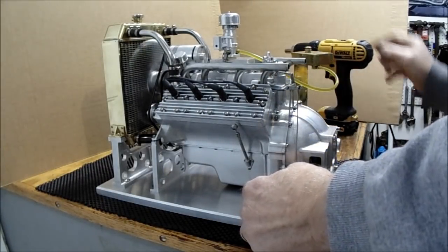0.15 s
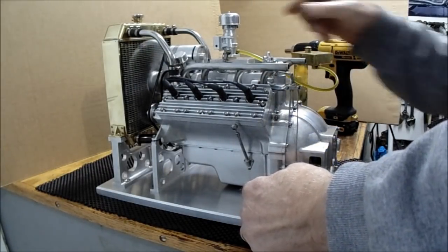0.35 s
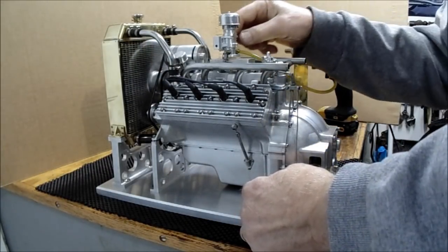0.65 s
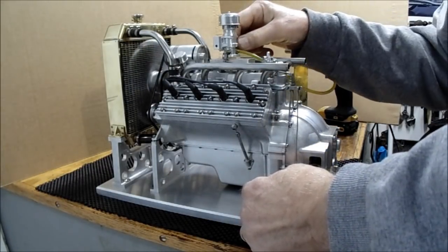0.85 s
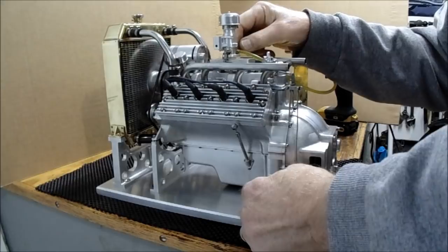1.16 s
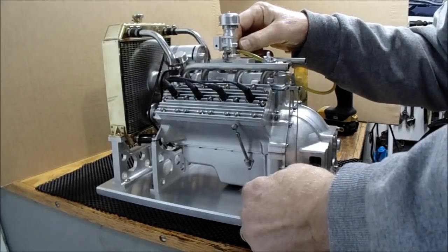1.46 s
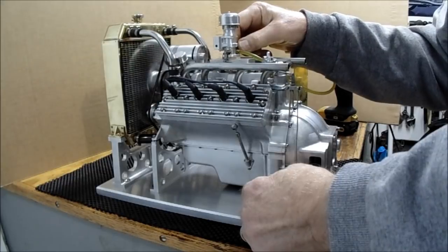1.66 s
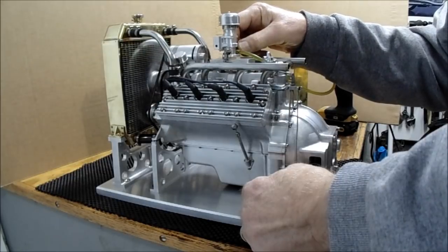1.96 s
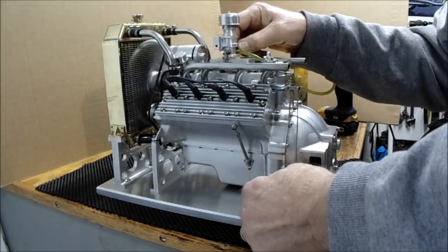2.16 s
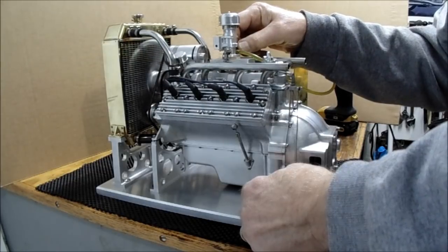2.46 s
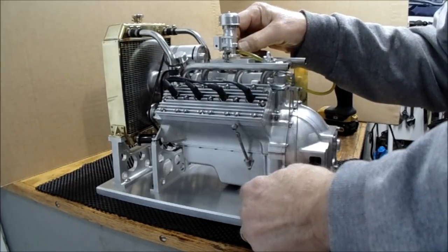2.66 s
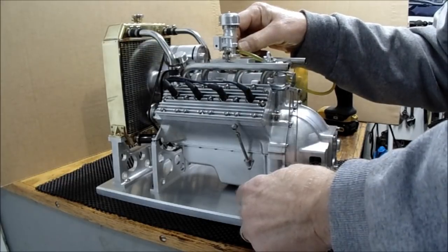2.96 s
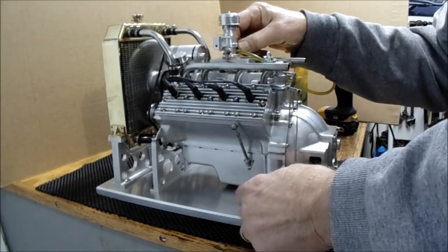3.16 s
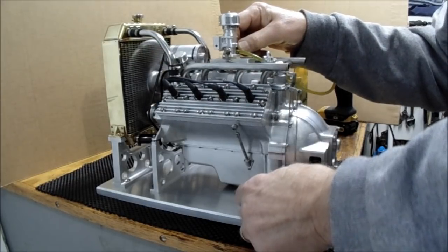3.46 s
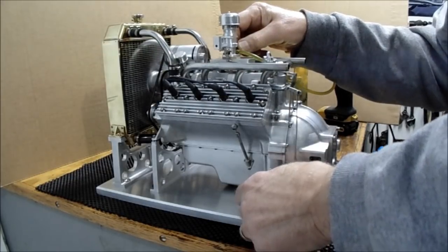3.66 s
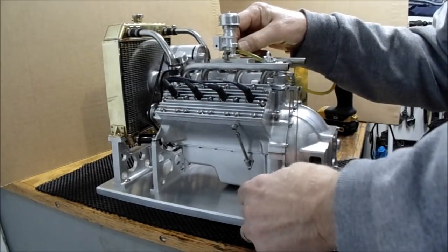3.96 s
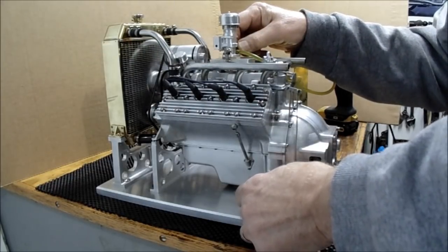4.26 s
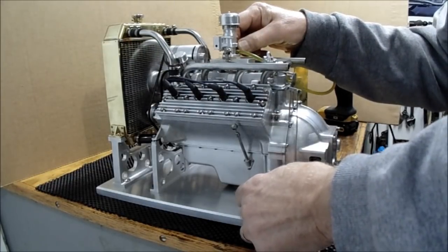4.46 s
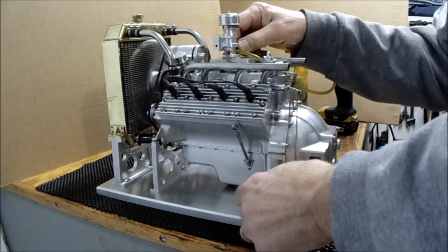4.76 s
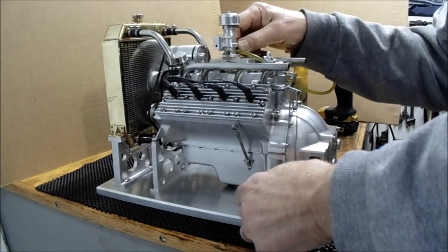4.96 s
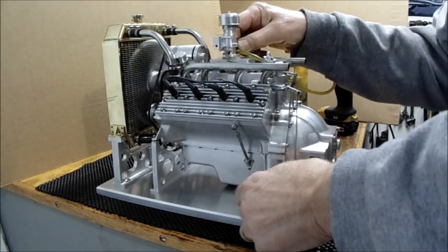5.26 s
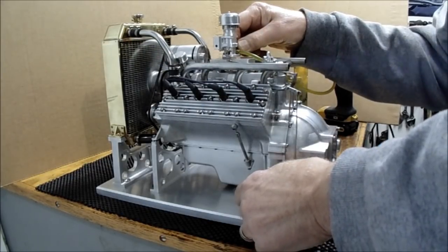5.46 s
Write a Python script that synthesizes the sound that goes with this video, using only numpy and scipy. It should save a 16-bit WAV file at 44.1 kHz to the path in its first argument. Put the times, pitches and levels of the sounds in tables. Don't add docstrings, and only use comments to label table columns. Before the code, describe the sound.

A small eight-cylinder engine idles lumpily on a bench, then revs up, dips briefly, and climbs to a tight, hissing, ticking snarl.

```python
import sys
import numpy as np
from scipy import signal
from scipy.fft import rfft, irfft
from scipy.io import wavfile
from scipy.ndimage import uniform_filter1d

SR = 44100
rng = np.random.default_rng(int(sys.argv[2]) if len(sys.argv) > 2 else 0)


def store_wav(level_fs):
    pcm = np.round(np.clip(np.atleast_2d(level_fs), -1, 1) * 32767)
    wavfile.write(sys.argv[1], SR, pcm.T.astype(np.int16))


def attenuation_scalar(level_db):
    decades = np.asarray(level_db, float) / 20
    return 10 ** decades


N = 247842

# delay in seconds, level in dB.
WALL_ECHOES = [(.0031, -26.5), (.0057, -19), (.0092, -19.5), (.0151, -20), (.023, -44)]
# start in seconds, peak in dB, pitch in Hz.
BENCH_KNOCKS = [(0.037, -33, 137), (0.102, -33, 140), (0.272, -31, 105), (0.457, -30, 135),
                (0.647, -30, 144), (0.723, -33, 127), (0.796, -34, 105.7), (0.89, -32, 140),
                (1.025, -32, 126), (1.17, -34, 108.1), (1.253, -32, 153.1), (1.321, -30.5, 115),
                (1.385, -37, 117), (1.466, -30, 135.3), (1.53, -35, 145.2), (1.601, -31, 135.6),
                (1.663, -34, 132.7), (1.723, -30, 121), (1.825, -30, 108.2), (1.889, -36, 113.3),
                (1.949, -29, 114), (2.125, -37, 152.3), (2.127, -31, 127), (2.238, -39, 111.6),
                (2.424, -25, 144.4), (2.601, -35, 109.4), (2.719, -27, 128.4), (2.79, -32, 114),
                (2.838, -28.5, 128.7), (2.922, -29, 153.6), (2.99, -26, 126.7), (3.093, -36, 151.6),
                (3.159, -31.5, 152), (3.271, -30, 130), (3.442, -42, 132.2), (3.601, -35, 151),
                (3.601, -35, 142), (3.657, -28, 129), (3.697, -42, 153), (3.763, -37, 148.4),
                (3.897, -33, 127), (4.055, -34, 153.8), (4.099, -36, 138), (4.287, -48, 153),
                (4.373, -46, 110.3), (4.47, -37, 121), (4.545, -37, 114), (4.767, -34, 121.2),
                (4.87, -31, 127), (5.038, -38, 134.2), (5.099, -30, 124), (5.209, -31, 133.6),
                (5.278, -30, 146), (5.466, -27, 128), (5.526, -38, 113)]
# order per engine cycle, level in dB re exhaust, # loudest at this
# firing rate in Hz, range in Hz.
CYCLE_TONES = [(2, -25, 178, 25), (5, -19, 192, 10), (10, -22, 255, 25), (12, -21, 255, 20), (14, -18, 197, 12),
               (16, -17, 180, 14), (16, -27, 228, 12), (16, -16.5, 262, 16), (21, -14, 192, 8),
               (24, -21, 211, 7), (26.5, -22, 258, 8), (34.5, -19.5, 263, 8)]
# pitch in Hz, width in Hz, level in dB.
CASTINGS = [(1880, 190, 1.5), (2450, 900, -11), (3130, 160, -9), (3665, 130, 3.5), (5300, 550, -7),
            (9200, 600, -13), (13760, 450, -5)]
# pitch in Hz, width in Hz, level in dB.
COVER = [(5240, 350, -6.5), (7000, 360, -2), (9300, 400, -4.5), (12300, 270, 1), (13500, 450, -3)]
# start in seconds, peak in dB, centre in Hz.
TICKS = [(0.9838, -18.5, 13600), (1.5948, -22, 13600), (1.8422, -16.5, 12170), (2.1356, -16, 7150),
         (2.3935, -18, 12010), (2.451, -9, 7080), (2.7084, -22, 7540), (2.7244, -16, 6430),
         (2.7852, -14, 11440), (2.8418, -14, 12170), (2.9781, -9.5, 12060), (3.027, -21, 9840),
         (3.0777, -10.5, 12190), (3.255, -21, 12220), (3.3252, -11, 12300), (3.4236, -10, 13120),
         (3.4995, -23, 12300), (3.7703, -17.5, 12160), (3.8361, -10, 7200), (3.849, -15, 12300),
         (3.704, -11, 12200), (3.721, -14, 8300), (2.761, -18, 12300), (2.858, -15, 5270),
         (4.1922, -28, 7710), (4.3971, -23, 5450), (4.4844, -27, 12400), (4.5042, -24, 12300),
         (4.5276, -22.5, 13220), (4.627, -26, 12900), (4.6458, -25, 13200), (4.8543, -16, 12390),
         (4.8873, -14, 8310), (4.9182, -15, 8000), (4.9551, -20, 10900), (5.0211, -17, 12300),
         (5.116, -19, 10890), (5.1284, -15, 13100), (5.1474, -13, 12300), (5.1784, -16, 12400),
         (5.2408, -18, 12600), (5.3733, -13, 12600), (5.3921, -12, 12600), (5.423, -15, 13100),
         (5.4536, -16, 13600), (5.484, -21, 12600), (5.5154, -14, 12400), (5.5453, -17, 13800),
         (5.5752, -17, 12600)]
JET_BANDS_HZ = [4600, 6300, 8800, 11500]
# frequency in Hz, level in dB per Hz.
HISS_IDLE = [(820, -19), (1400, -9.5), (1900, -4.5), (2400, -8.5), (3300, -4), (4000, -5), (4520, -10.5),
             (5230, -10), (7000, -6), (11300, -7.5), (12800, -6), (13700, -4.5), (14400, -1.5)]
# frequency in Hz, level in dB per Hz.
HISS_OPEN = [(820, -26), (1400, 7.5), (2170, 2), (3550, 2), (4570, -4), (5440, 1.5), (6000, 0.5),
             (7300, 2.5), (8750, -0.5), (11600, -0.5), (12300, 1), (12800, 2), (13200, 3.5), (14400, -4.5)]
# pitch in Hz, width in Hz, level in dB.
PLATE = [(617, 66, -4), (848, 81, -1.5), (983, 106, -2.5), (1137, 82, -4), (1206, 59, -4), (1299, 99, -8.5)]
# start in seconds, peak in dB.
RAPS = [(0.217, -17), (0.786, -18), (0.976, -14), (1.018, -15), (1.051, -14), (1.164, -17), (1.271, -17),
        (1.311, -17), (1.34, -14), (1.385, -18), (1.481, -16), (1.595, -16), (1.737, -16), (1.806, -14.5),
        (1.878, -17), (1.898, -17), (2.433, -15), (2.582, -18), (2.661, -17.5), (2.724, -11), (2.754, -15),
        (2.824, -16), (2.859, -14), (2.885, -17), (2.971, -12), (3.026, -14), (3.076, -14), (3.324, -13),
        (3.42, -15), (3.57, -15), (3.608, -16), (3.815, -23), (3.944, -21), (4.441, -18), (4.555, -22),
        (4.845, -17), (5.324, -22), (5.422, -21), (5.574, -16), (5.598, -16)]
# frequency in Hz, level in dB.
EXHAUST = [(25, -93), (70, -32), (120, -22.5), (165, -19.5), (190, -14), (215, -6.5), (242, -5), (290, -5),
           (350, -8.5), (415, -16), (495, -17), (530, -14.5), (585, -36), (1500, -44.5)]
# centre in seconds, loss in dB, length in seconds.
GASPS = [(3.047, 5.5, .008), (3.111, 5.5, .008), (3.148, 6, 0.011), (3.256, 1.5, .01), (3.323, -2, 0.0053),
         (3.395, 0, 0.0071), (3.497, 2, .012), (3.562, 4, .007), (3.598, -2, 0.0053), (3.622, 2, 0.013),
         (3.681, 0, 0.0052), (1.171, 3, 0.0092), (1.264, 4, .009), (1.312, 2, .008), (1.408, 3, .008),
         (1.451, 2, .008), (1.803, 3, 0.0086), (2.13, 6, 0.0099), (2.769, 3, .008), (2.817, 3, 0.0071),
         (2.974, 4, .008), (0.297, 0, .01), (.53, 1, .01), (0.663, 2, .01), (.73, 0, .01),
         (3.99, -2.5, 0.011), (3.9, 7, 0.0096), (4.395, -1.5, 0.007), (4.432, 0, 0.006), (4.495, 0, 0.017),
         (4.532, 1, 0.0069), (4.584, -3, 0.007), (4.655, 2.5, 0.16), (4.819, 5.5, 0.014),
         (4.922, 2.5, 0.03), (4.989, 2, .012), (5.104, 3, 0.011), (5.226, 2, .008), (5.287, 0, .008),
         (5.319, 6, .005), (5.351, 7, 0.007), (5.39, 3, .01), (5.587, 5, 0.0065), (5.616, 9, 0.0088)]
# strength in dB, lateness as share of a period, gas puff in dB.
CYLINDERS = [(3.2, .005, 3), (.4, -.05, -3), (-1.4, .03, -2), (-5.5, .06, -4), (1.2, -.01, -1),
             (-3.4, -.06, -5), (-.4, .02, -3), (.4, .045, -4)]
# time in seconds, change in dB, reach in seconds.
MISFIRES = [
    (1.05, 4, .012),
    (1.5, 5, .014),
    (2.883, 7, .01),
    (3.903, -30, .006),
    (4.917, -18, .008),
    (4.984, -12, .006),
    (5.098, -23, .007),
    (5.283, -13, .006),
    (5.381, -28, .007),
    (5.576, -23, .006),
]
# centre in seconds, loss in dB, length in seconds.
STUMBLES = [(0.028, 6, .025), (0.075, -6, .025), (0.139, 3, 0.023), (0.203, 5, 0.018), (0.25, -5, 0.036),
            (0.375, 8, 0.026), (0.485, -1.5, 0.036), (0.558, 4, 0.036), (0.765, -3, 0.03),
            (0.823, 2, 0.015), (0.844, -1.5, .015), (0.899, 4, 0.029), (0.938, 3, 0.022),
            (1.024, -2, 0.019), (1.061, 6, 0.014), (1.117, 2, 0.016), (1.215, 7, 0.043), (1.357, 3, 0.027),
            (1.414, 4, 0.015), (1.502, 9, 0.014), (1.552, 4, 0.017), (1.615, 2, 0.01), (1.757, 6, 0.024),
            (1.856, 7, 0.021), (1.94, -3, 0.024), (2.038, 8, 0.031), (2.118, 2.5, 0.0306),
            (2.193, 6, 0.019), (2.302, 10, 0.034), (2.367, 9, 0.013), (2.438, 5, 0.0094),
            (2.52, 12.5, 0.037), (2.563, 5, 0.022), (2.628, 8, 0.029), (2.689, 3.5, 0.013),
            (2.762, 5, 0.011), (2.88, 6, 0.011), (2.902, 2.5, 0.0059), (2.951, 5.5, 0.0075)]
# time in seconds, firing rate in Hz, burn scatter in dB.
SPEED = [(0, 100, 5.2), (.88, 105, 4.8), (1.0, 119, 3.4), (2.62, 118, 3.8), (2.93, 135, 4.5),
         (3.0, 154, 4.4), (3.24, 185, 5.6), (3.58, 201, 5.2), (3.73, 236, 2.6), (3.97, 249, 2.5),
         (4.02, 192, 4), (4.13, 146, 5), (4.32, 190, 5.5), (4.45, 206, 5), (4.64, 213, 5), (5.04, 250, 3.2),
         (5.22, 257.5, 2.8), (5.62, 265, 2.6)]
# time in seconds, load as exhaust level in dB, gas flow in dB.
THROTTLE = [(0, -31.5, -31.5), (.5, -32.5, -31), (.9, -28, -28.5), (1.0, -23, -28), (1.65, -22, -26.5),
            (2.45, -22.5, -28.5), (2.72, -21, -28), (3.07, -23.5, -24.5), (3.15, -24, -28),
            (3.58, -24, -28), (3.7, -20.5, -26), (3.78, -20.5, -30), (3.96, -23, -31.5),
            (4.04, -38.5, -38.5), (4.15, -35.5, -40), (4.3, -31.5, -34.5), (4.88, -22, -30),
            (5.62, -22.5, -29)]
STRONG_S = [3.334, 3.417, 3.494, 3.572, 3.648, 3.751, 3.85, 3.947, 4.52, 5.015, 5.078, 5.173, 5.265, 5.357,
            5.448, 5.54, 5.599]


def level(x, span=0.26):
    return x / np.sqrt(uniform_filter1d(x ** 2, int(span * SR)) + 1e-9)


def curve(table):
    s, *columns = np.transpose(table)
    return [np.interp(np.arange(N) / SR, s, c) for c in columns]


def bump(s, length):
    return np.exp(-((np.arange(N) / SR - s) / length) ** 2)


def bumps(table):
    return sum(db * bump(s, length) for s, db, length in table)


def colour(x, points, size=8192):
    hz, db = np.transpose(points)
    bins_hz = np.arange(size // 2 + 1) * SR / size
    gain = np.interp(np.log(bins_hz + 1), np.log(hz), db) * np.log(10) / 20
    cep = irfft(gain)
    cep[1:size // 2] *= 2
    cep[size // 2 + 1:] = 0
    return signal.fftconvolve(x, irfft(np.exp(rfft(cep))))[:N]


def ring(x, modes):
    out = 0
    for k, (hz, width, db) in enumerate(modes):
        mode = signal.lfilter(*signal.iirpeak(hz, hz / width, SR), x)
        out = out + (-1) ** k * attenuation_scalar(db) * mode
    return out


def impulses(at, size):
    whole = np.clip(at.astype(int), 0, N - 1)
    part = at - np.floor(at)
    early = np.bincount(whole, size * (1 - part), N + 1)
    late = np.bincount(whole + 1, size * part, N + 1)
    return (early + late)[:N]


def walk(rate):
    k = int(SR / rate)
    steps = np.repeat(rng.standard_normal(N // k + 1), k)
    return 0.576 * uniform_filter1d(uniform_filter1d(steps, k), k)[:N]


def idling(hz):
    return np.interp(hz, (120, 180), (1, 0))


def firing_places(turns):
    count = np.arange(1, int(turns[-1]))
    return count, np.interp(count, turns, np.arange(N))


def shop(x):
    t60_s = .2
    t = np.arange(int(.5 * SR)) / SR
    tail = rng.standard_normal(len(t)) * attenuation_scalar(-60 * t / t60_s) * (t > .006)
    return attenuation_scalar(-10.5) * signal.fftconvolve(x, tail / np.linalg.norm(tail))[:N]


def walls(near):
    delay, db = np.transpose(WALL_ECHOES)
    return signal.fftconvolve(near, impulses(delay * SR, attenuation_scalar(db))[:2048])[:N]


def rumble(hz):
    shake = [(15, -44), (28, -19), (42, -13.5), (70, -12.0), (110, -5), (300, -51)]  # (Hz, dB)
    low = colour(rng.standard_normal(N), shake)
    db = -48.5 + 0.1492 * (hz - 127) - .11 * np.maximum(hz - 175, 0)
    db = db + 3.5 * walk(9.5) - 6.0 * bump(4.2, .2)
    return level(low) * attenuation_scalar(db)


def thuds():
    out = np.zeros(N + 4000)
    t = np.arange(4000) / SR
    swell = (t / 0.011) ** 2 * np.exp(-t / 0.011)
    for s, db, hz in BENCH_KNOCKS:
        start = int(s * SR)
        out[start:start + 4000] += attenuation_scalar(db + 2.5) * swell * np.sin(2 * np.pi * hz * t)
    return out[:N]


def cycle_tones(turns, hz):
    out = 0
    for order, db, best_hz, range_hz in CYCLE_TONES:
        flutter = attenuation_scalar(db + 3.5 * walk(20.72))
        resonance = np.exp(-((hz - best_hz) / range_hz) ** 2)
        out = out + flutter * resonance * np.sqrt(2) * np.sin(2 * np.pi * order * turns / 8)
    return out


def whirring_castings(jet):
    gears = attenuation_scalar(0.7 * walk(25.95)) * rng.standard_normal(N) + 0.29 * jet
    out = 0
    for mode in CASTINGS:
        sharp = ring(ring(gears, [mode]), [(*mode[:2], 0)])
        out = out + attenuation_scalar(1.4 * walk(16)) * sharp
    return level(out)


def gear_rattle(jet):
    note = [(1900, 150, 0)]  # (Hz, width Hz, dB)
    return attenuation_scalar(-58) * level(ring(ring(jet, note), note))


def tappet(turns, hz):
    start = turns[int(5.4545 * SR)] % 8
    at = np.interp(np.arange(start, turns[-1], 8), turns, np.arange(N)).astype(int)
    chance = rng.standard_normal((160, 3))[:len(at)].T
    db = -20 + 0.5 * (hz[at] - 260) - 5 * np.minimum(chance[0], 1)
    return list(zip(at / SR, db, 12600 * (1 + 0.034 * chance[1])))


def ticks(turns, hz):
    out = np.zeros(N + 800)
    t = np.arange(800) / SR
    rows = list(TICKS) + tappet(turns, hz)
    noise = rng.standard_normal((240, 800))
    for (s, db, centre_hz), n in zip(rows, noise):
        tone = signal.lfilter(*signal.iirpeak(centre_hz, 14.0, SR), n)
        broad = np.diff(n, prepend=0)
        contact = (2.4 * tone + 0.42 * broad) * (1 - np.exp(-t / 0.00073)) * np.exp(-t / 0.0023)
        cover = .8 * ring(n, COVER) * (1 - np.exp(-t / 0.001)) * np.exp(-t / .005)
        out[int(s * SR):int(s * SR) + 800] += attenuation_scalar(db + 2.0) * (contact + cover)
    return out[:N]


def gas(puffs, hz):
    opening = np.clip((hz - 125) / 60, 0, 1)
    t = np.arange(400) / SR
    flare = (1 - np.exp(-t / 0.0011)) * np.exp(-t / 0.0013)
    flares = signal.fftconvolve(puffs, flare[None])[:, :N]
    crackle = np.array([[.7], [.9], [.8], [.8], [1.1]]) * (1.17 + 0.48 * opening)
    jets = (0.57 + crackle * flares) * attenuation_scalar(0.73 * walk(14)) * rng.standard_normal((5, N))
    band = np.searchsorted(JET_BANDS_HZ, np.fft.rfftfreq(N, 1 / SR))
    jet = irfft(np.choose(band, rfft(jets)), N)
    idle, wide = level(colour(jet, HISS_IDLE)), level(colour(jet, HISS_OPEN))
    wide = wide + attenuation_scalar(-16) * level(ring(jet, COVER[3:4]))
    return (1 - opening) * idle + opening * wide, jet


def raps():
    s, db = np.transpose(RAPS)
    t = np.arange(900) / SR
    blow = ring(1. * (t == 0), PLATE)
    crack = ring(rng.standard_normal(900), [(3000, 3900, 0)]) * np.exp(-t / 0.0029)
    blow = blow / abs(blow).max() + attenuation_scalar(-12) * crack
    return signal.fftconvolve(impulses(s * SR, attenuation_scalar(db - 5.5)), blow)[:N]


def plate_bark(pulses, jet):
    return level(level(ring(pulses, PLATE)) + 1.15 * level(ring(jet, PLATE)))


def in_step(turns):
    pipe_lag_s, ease_from_s = .003, 2.7
    at = ((np.array(STRONG_S) - pipe_lag_s) * SR).astype(int)
    shift = np.unwrap(np.append(0, -turns[at] % 8), period=8)
    return turns + np.interp(np.arange(N), np.append(ease_from_s * SR, at), shift)


def firings(turns, hz, scatter_db):
    count, at = firing_places(turns)
    place = at.astype(int)
    scatter_db, hz = scatter_db[place], hz[place]
    strength_db, late, puff_db = np.transpose(CYLINDERS)[:, count % 8]
    chance = rng.standard_normal((1200, 8))[count].T
    habit = 1.1 - .5 * idling(hz)
    at = np.minimum(at + (habit * late + .0145 * scatter_db * chance[0]) * SR / hz, N - 1)
    burn_db = habit * strength_db + scatter_db * np.minimum(chance[1], .6)
    burn_db = burn_db + sum(db * (abs(at / SR - s) < reach) for s, db, reach in MISFIRES)
    puff_db = puff_db + .5 * burn_db + 3.0 * np.clip(chance[2], -2, 1.5)
    puffs = [impulses(at, attenuation_scalar(puff_db + 4.0 * np.clip(c, -2, 1.7))) for c in chance[3:]]
    return impulses(at, attenuation_scalar(burn_db)), puffs


def manifold(turns, scatter_db):
    note_hz, width_hz = 246, 22
    _, at = firing_places(turns)
    beat = impulses(at, np.interp(scatter_db[at.astype(int)], (3.2, 5.2), (1, 0)))
    near = np.exp(-((np.fft.rfftfreq(N, 1 / SR) - note_hz) / width_hz) ** 2)
    return .8 * irfft(rfft(beat) * near, N)


def exhaust_pipe(pulses, turns, hz, scatter_db):
    roar = .105 * scatter_db * level(colour(rng.standard_normal(N), EXHAUST))
    pipe = level(colour(pulses + manifold(turns, scatter_db), EXHAUST)) + roar
    pipe = pipe - .45 * idling(hz) * ring(pipe, [(520, 280, 0)])
    return level(pipe + shop(pipe), .07)


def scene():
    exhaust_db, hiss_db = curve(THROTTLE)
    hz, scatter_db = curve(SPEED)
    loss_db = bumps(STUMBLES)
    hz = hz - .9 * np.roll(loss_db, int(.02 * SR))
    scatter_db = scatter_db + .2 * loss_db
    exhaust_db, hiss_db = exhaust_db - loss_db, hiss_db - .2 * loss_db
    load_db, flow_db = exhaust_db + 22, hiss_db + 29
    bark_db = -29.5 + .12 * load_db + .94 * flow_db + .0067 * (hz - 116)
    castings_db = -35 + .098 * load_db + .95 * flow_db - 0.115 * np.maximum(hz - 125, 0)
    turns = in_step(np.cumsum(hz * (1 + .013 * walk(9))) / SR + .4)

    lope = np.cos(2 * np.pi * (turns - turns[int(1.565 * SR)]) / 8) * idling(hz)
    exhaust_db, bark_db = exhaust_db - 1.2 * lope, bark_db - 1.2 * lope
    swing = np.cos(2 * np.pi * (turns / 8 - .05)) * (1 - idling(hz))
    exhaust_db = exhaust_db + .4 * swing - bumps(GASPS)
    overrun = bump(4.12, .11)
    bark_db, castings_db = bark_db + 3 * overrun, castings_db + 3 * overrun

    pulses, puffs = firings(turns, hz, scatter_db)
    hiss, jet = gas(puffs, hz)
    near = attenuation_scalar(castings_db) * whirring_castings(jet) + overrun * gear_rattle(jet)
    near = near + ticks(turns, hz) + attenuation_scalar(hiss_db + 3.0) * hiss
    near = near + raps() + attenuation_scalar(bark_db) * plate_bark(pulses, jet)
    exhaust = exhaust_pipe(pulses, turns, hz, scatter_db) + cycle_tones(turns, hz)
    bench = rumble(hz) + thuds()
    return (bench + 0.94 * (near + walls(near)) + attenuation_scalar(exhaust_db + 4.5) * exhaust)[None]


def roll_off(x):
    return signal.sosfilt(signal.butter(12, 14245, fs=SR, output="sos"), x)


def record(dry):
    top = signal.ellip(12, .2, 80, 14245, fs=SR, output="sos")
    rounded = np.tanh(1.126 * dry) / 1.116
    return roll_off(signal.sosfilt(top, rounded))


dry = scene()
out = record(dry)
store_wav(out)
```